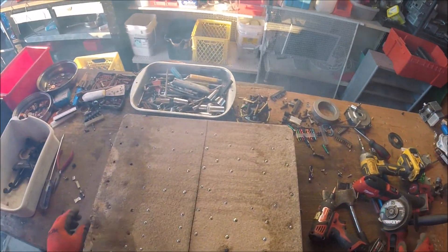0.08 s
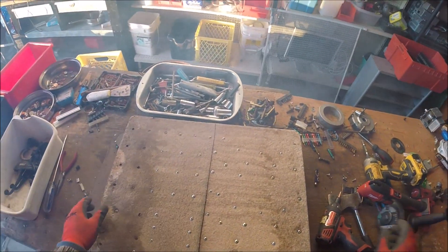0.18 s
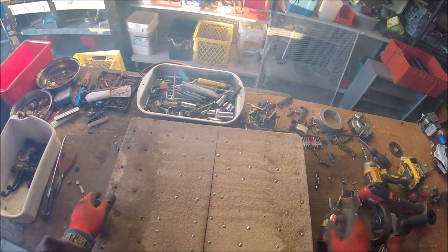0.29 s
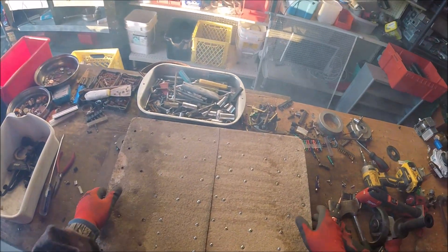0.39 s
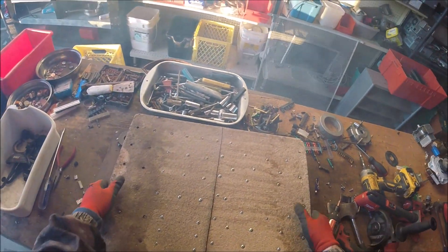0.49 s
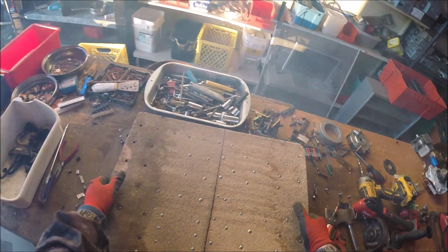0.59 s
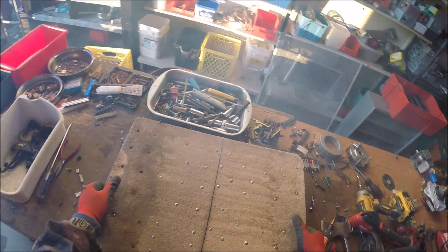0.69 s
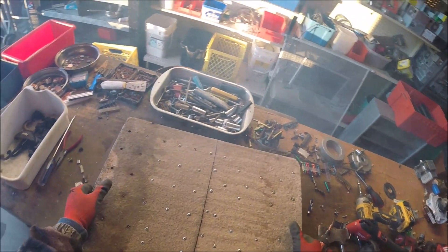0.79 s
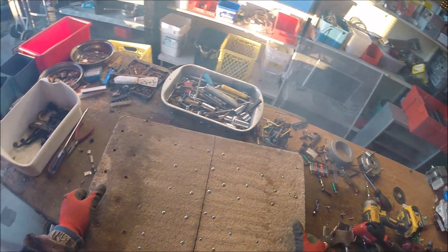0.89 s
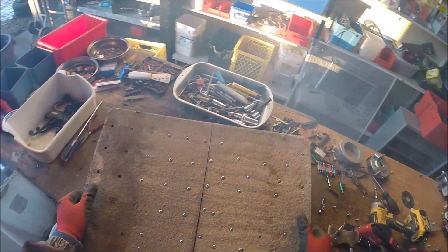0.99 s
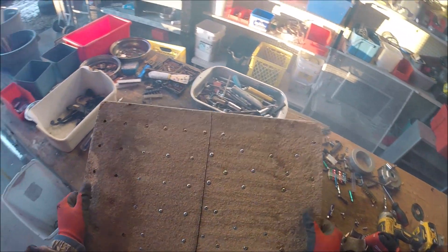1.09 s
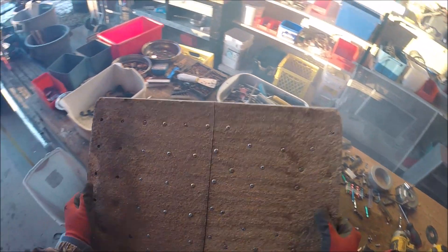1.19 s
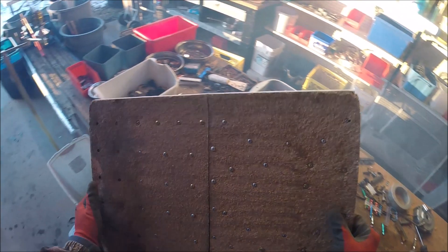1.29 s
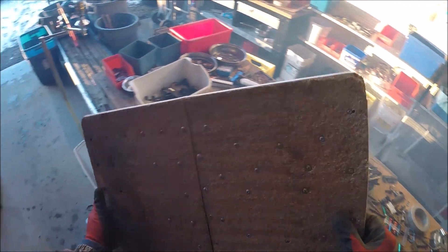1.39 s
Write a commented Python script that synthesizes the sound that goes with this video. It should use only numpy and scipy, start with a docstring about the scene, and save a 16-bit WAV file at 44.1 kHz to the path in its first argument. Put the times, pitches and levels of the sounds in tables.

```python
"""First a low wooden rub and soft thuds: a heavy board is dragged off a cluttered workbench and lifted.
The thuds are swelling sines that set off the bench's damped modes; the edge knocks and grit snaps are
bursts of tiny contacts. The slide is coloured random clicks. Jogged steel tools clank, tinkle and chime
as ringing modes, and one sharp tap sounds as the board comes clear. A small workshop echoes the blows."""
import sys
import numpy as np
from scipy import signal
from scipy.fft import rfft, irfft
from scipy.io import wavfile
from scipy.ndimage import uniform_filter1d, minimum_filter1d

SR = 44100
rng = np.random.default_rng(int(sys.argv[2]) if len(sys.argv) > 2 else 0)


def transcribe(u):
    """Save the signal u as a 16-bit wav file named by the first command-line argument.

    u: samples, shape (n,) or (channels, n), limited to [-1, 1]; the rate is SR.
    q: integer samples, one column per channel.
    """
    v = np.clip(np.atleast_2d(u).T, -1, 1)
    q = np.round(v * 32767).astype(np.int16)
    wavfile.write(sys.argv[1], SR, q)


N = 63945
T = np.arange(N) / SR


def from_db(db):
    """Decibels to gain."""
    return 10 ** (np.asarray(db) / 20)


def rms_one(x):
    """Scale to unit rms."""
    return x / np.sqrt(np.mean(x ** 2) + 1e-20)


def colour(x, points, tilt_db=0):
    """Filter by a spectrum, tilted around 1 kHz in dB per octave."""
    hz = np.maximum(np.arange(N + 1) * SR / (2 * N), 1)
    point_hz, point_db = np.transpose(points)
    # the tilt levels off below 300 Hz and above 8 kHz
    octaves = np.log2(np.clip(hz, 300, 8000) / 1000)
    gain_db = np.interp(np.log(hz), np.log(point_hz), point_db) + tilt_db * octaves
    return irfft(rfft(x, 2 * N) * from_db(gain_db))[:N]


def since(start):
    """Time elapsed after a moment, zero before it."""
    return np.maximum(T - start, 0)


def swelling(start, swell):
    """Envelope that peaks one swell time after its start, then dies away."""
    t = since(start) / swell
    return t * np.exp(1 - t)


def ring(start, modes):
    """Damped modes struck at one moment; each falls 60 dB in its t60."""
    t = since(start)
    return sum(from_db(db - 60 * t / t60) * np.sin(2 * np.pi * hz * t) for hz, db, t60 in modes)


def grains(rate, spread_db):
    """Random clicks of uneven size and either sign, at a mean rate per second."""
    sizes = from_db(spread_db * np.minimum(rng.exponential(1, N), 4))
    struck = rng.random(N) < rate / SR
    return struck * sizes * rng.choice([-1, 1], N)


CONTACT_SPREAD_DB, CONTACT_ATTACK_S = 3.5, 0.00057


def crush(start, decay, spectrum, tilt_db=0):
    """A fast-dying burst of tiny contacts; before its level is set, its energy depends on length alone."""
    t = since(start)
    envelope = (1 - np.exp(-t / CONTACT_ATTACK_S)) * np.exp(-t / decay)
    contacts = colour(grains(SR / 4, CONTACT_SPREAD_DB), spectrum, tilt_db)
    return rms_one(envelope * contacts) * np.sqrt(np.mean(envelope ** 2))


# the board bumps the bench:
# (time [s], level [dB], pitch [Hz], swell [s], level of the bench's ring [dB])
BOARD_THUDS = [(0.1272, -26.5, 359, 0.0044, -59), (0.131, -23, 200, 0.011, -48),
               (0.2374, -9, 206.5, 0.0033, -36), (0.2515, -4.5, 224, 0.0047, -20),
               (.2565, -18, 490, 0.0033, -45), (0.303, -13, 220, 0.0036, -50),
               (.364, -24.5, 162, 0.0062, -49), (.494, -8, 208, 0.0043, -30),
               (.516, -12, 237.5, 0.0037, -55), (.541, -15, 254.7, 0.0074, -64),
               (.633, -11.5, 199, 0.00475, -36.5), (0.672, -18.5, 325, 0.0035, -44),
               (.722, -14.5, 340, 0.0052, -35), (.745, -16, 230, .005, -35),
               (0.834, -24.5, 283, 0.0051, -42), (.908, -25, 400.5, 0.012, -60),
               (1.128, -26.5, 430, .006, -68)]
# modes of bench and board: (frequency [Hz], level [dB], t60 [s])
BENCH_MODES = [(141.3, 0, 0.58), (159.3, 13, 0.11), (248.8, -3.5, 0.38), (294.6, -5, 0.47), (366, -9, 0.1),
               (529, -7.5, 0.26), (579.3, -6.5, 0.3), (653, -8.5, 0.32), (961, -7, 0.18)]


def thuds():
    """Each soft bump swells, dies within a few cycles and rings the bench, a little differently each time."""
    out = np.zeros(N)
    for start, db, hz, swell, ring_db in BOARD_THUDS:
        out += from_db(db) * swelling(start, swell) * np.sin(2 * np.pi * hz * since(start))
        modes = [(mode_hz, mode_db + rng.normal(0, 1), t60) for mode_hz, mode_db, t60 in BENCH_MODES]
        out += from_db(ring_db) * ring(start + swell, modes)
    return out


# gritty knocks of the board's edge: (time [s], level [dB], tilt [dB per octave], decay [s])
EDGE_KNOCKS = [(0.2388, -19, -.7, 0.011), (.252, -13, -2, 0.0087), (0.2586, -12.5, 0.35, 0.0083),
               (0.272, -23.5, .5, 0.034), (0.303, -27, 5, 0.0059), (0.494, -30.5, 2.5, 0.018),
               (0.5014, -15, -.6, 0.0048), (0.635, -26.5, -1.3, 0.013), (0.699, -23.5, 1.5, 0.0072),
               (.708, -25.5, -0.5, 0.0083), (0.7214, -15, 6, 0.0024), (0.7242, -15.5, 6.5, 0.0053),
               (.745, -30, 3, 0.028), (.805, -35.5, 10.5, 0.0086), (0.908, -24.5, 2.5, 0.0055),
               (.947, -29.5, 3.2, 0.0071), (1.064, -27.5, 2.5, 0.011), (1.1215, -30, 7, 0.014),
               (1.1995, -30.5, 4.2, 0.006), (1.2388, -28, 4.5, 0.0053), (1.2665, -27.5, 4.5, 0.0052),
               (1.347, -18.5, 3, 0.0037)]
# spectrum of a knock: (frequency [Hz], level [dB])
KNOCK_SPECTRUM = [(130, -7), (400, 11.5), (900, -2), (1600, -7), (2500, -12.5), (3800, -22.5), (5500, -24),
                  (7000, -39), (10300, -48.5), (11700, -69), (15000, -61)]


def knocks():
    """The board's edge knocks in bursts of gritty contacts, each with its own brightness and length."""
    return sum(from_db(db) * crush(start, decay, KNOCK_SPECTRUM, tilt_db)
               for start, db, tilt_db, decay in EDGE_KNOCKS)


# hard grit cracks under the board: (time [s], level [dB], decay [s])
GRIT_SNAPS = [(.238, -41, 0.0018), (.256, -37, .003), (.2595, -29, 0.0028), (.3375, -34, 0.0016)]
# spectrum of a snap: (frequency [Hz], level [dB])
SNAP_SPECTRUM = [(1000, -17), (5000, 6), (10400, -1), (11600, -20), (15000, -30)]


def snaps():
    """Hard grit cracks in bright bursts of a few milliseconds."""
    return sum(from_db(db) * crush(start, decay, SNAP_SPECTRUM) for start, db, decay in GRIT_SNAPS)


TAP_S, TAP_DB, TAP_CONTACT_S, TAP_LOW_CUT_HZ = 1.3462, -20, 0.00037, 187
# modes of the last sharp tap: (frequency [Hz], level [dB], t60 [s])
TAP_MODES = [(195, -7, 0.15), (412, 4, 0.015), (860, 8.5, 0.009), (1275, 4, 0.012), (2030, 6.5, 0.017),
             (2520, 4, 0.01), (3060, 0.5, 0.016), (3930, -1, 0.01)]


def tap():
    """One hard, short contact close to the microphone, its modes smoothed by the push, with little bass."""
    push = T * np.exp(-T / (TAP_CONTACT_S / 2 / np.pi))
    struck = signal.fftconvolve(ring(TAP_S, TAP_MODES), push / push.sum())[:N]
    low_cut = signal.butter(2, TAP_LOW_CUT_HZ, "high", fs=SR, output="sos")
    return from_db(TAP_DB) * signal.sosfilt(low_cut, struck)


SLIPS_PER_S, SLIP_SPREAD_DB = 1500, 2.0
GRAINS_PER_S, GRAIN_SPREAD_DB = 2600, 4.0
# the bench drones less, against the rub, as the weight leaves it
DRONE_DB, DRONE_FADE_DB_PER_S = 0.5, 15
# the drag: (time [s], level of rub and drone [dB], level of the grit [dB])
SLIDE_LEVELS = [(0, -53.5, -55.5), (.08, -42, -56), (0.221, -44, -59.5), (0.278, -31, -37.5),
                (0.358, -30, -41.5), (0.449, -37.5, -49.5), (.55, -26, -46.5), (0.611, -35, -51),
                (.69, -30.5, -44.5), (.77, -27.5, -37), (0.828, -33, -45), (0.928, -27.5, -39.5),
                (1.0, -38, -48.5), (1.08, -33, -50.5), (1.25, -35.5, -42), (1.32, -43.5, -46.5),
                (1.45, -43, -50)]
# spectra of the board's rub, the bench's drone and the grit: (frequency [Hz], level [dB])
RUB_SPECTRUM = [(140, -20), (200, -3.5), (290, -0.5), (440, -2), (540, -15), (900, -16.5), (2000, -34.5),
                (12000, -86)]
DRONE_SPECTRUM = [(100, -34), (145, 9.5), (210, 1), (700, -96)]
GRIT_SPECTRUM = [(200, -18), (600, 3), (1100, 1.5), (2300, -1.5), (3900, -10), (5500, -12), (6800, -25.5),
                 (10200, -30), (11700, -49), (15000, -62)]


def slide():
    """Uneven slips drum on board and bench while grit crunches between them."""
    time, rub_db, grit_db = np.transpose(SLIDE_LEVELS)
    slips = grains(SLIPS_PER_S, SLIP_SPREAD_DB)
    drone_gain = from_db(DRONE_DB - DRONE_FADE_DB_PER_S * T)
    rub = rms_one(colour(slips, RUB_SPECTRUM)) + drone_gain * rms_one(colour(slips, DRONE_SPECTRUM))
    grit = rms_one(colour(grains(GRAINS_PER_S, GRAIN_SPREAD_DB), GRIT_SPECTRUM))
    return from_db(np.interp(T, time, rub_db)) * rms_one(rub) + from_db(np.interp(T, time, grit_db)) * grit


CHATTER_DB, CHATTER_HZ = 4, 140  # depth of the flutter and its upper rate


def chatter():
    """Random flutter in the level of a loose part's ring; rms 1."""
    low_pass = signal.butter(2, CHATTER_HZ, fs=SR, output="sos")
    flutter = signal.sosfilt(low_pass, rng.standard_normal(N))
    return rms_one(from_db(CHATTER_DB * rms_one(flutter)))


# steel tools are jogged: (time [s], level [dB])
TOOL_CLANKS = [(0.2575, -40.5), (.699, -36), (0.7232, -26)]
# modes of the tools: (frequency [Hz], level [dB], t60 [s])
TOOL_MODES = [(1290, -8, 0.07), (2144, -.5, 0.11), (2500, -7, 0.1), (3020, -5, 0.05), (4350, -2.5, 0.026),
              (5400, -30, 0.21)]


def clanks():
    """Jogged tools ring in damped modes, each mode chattering on its own."""
    out = np.zeros(N)
    for mode in TOOL_MODES:
        out += chatter() * sum(from_db(db) * ring(start, [mode]) for start, db in TOOL_CLANKS)
    return out


TINK_TWIN_RATIO, TINK_TWIN_DB = 0.95, -5  # each part rings with a close second mode
# small loose parts tinkle: (time [s], level [dB], pitch [Hz], t60 [s])
PART_TINKS = [(.272, -43, 5110, 0.14), (0.3381, -34, 5000, 0.021), (.518, -37, 4120, 0.0122),
              (.806, -29.5, 5390, 0.037), (1.125, -31, 3560, 0.03), (1.125, -35, 5800, 0.045),
              (1.246, -37, 5760, 0.028), (1.408, -42, 5280, 0.019)]


def tinks():
    """Small loose parts ring steadily in a pair of close, damped modes."""
    return sum(ring(start, [(hz, db, t60), (hz * TINK_TWIN_RATIO, db + TINK_TWIN_DB, t60)])
               for start, db, hz, t60 in PART_TINKS)


CHIME_S, CHIME_SWELL_S = 1.135, 0.018
# modes of a steel socket: (frequency [Hz], level [dB])
CHIME_MODES = [(6406, -47), (7477, -48)]


def chime():
    """A socket rolls against its neighbours: its chattering ring swells and fades."""
    tones = sum(from_db(db) * chatter() * np.sin(2 * np.pi * hz * T) for hz, db in CHIME_MODES)
    return swelling(CHIME_S, CHIME_SWELL_S) * tones


ROOM_T60_S, ROOM_DELAY_S = 0.47, 0.005


def workshop(x):
    """Dense reflections from shelves and clutter, dying evenly."""
    echoes = grains(SR / 10, 2) * (T > ROOM_DELAY_S) * from_db(-60 * T / ROOM_T60_S)
    return signal.fftconvolve(x, echoes / np.sqrt(np.sum(echoes ** 2)))[:N]


AIR_DB = -47
# spectrum of the room's air: (frequency [Hz], level [dB])
AIR_SPECTRUM = [(30, -13), (130, -18), (250, 7), (500, 1), (1000, 1.5), (2000, -13), (3500, -29),
                (5300, -18), (7000, -18.5), (10300, -22.5), (11500, -30), (15000, -35)]


def air():
    """The room's air as steady coloured noise."""
    return from_db(AIR_DB) * rms_one(colour(rng.standard_normal(N), AIR_SPECTRUM))


BRIGHT_ROOM_DB, THUD_ROOM_DB = -10, -12.5  # sends to the room: knocks and steel, thuds and tap


def scene():
    """Blows and their reflections over the slide and the room's air."""
    near = thuds() + tap()
    bright = knocks() + snaps() + clanks() + tinks() + chime()
    room = workshop(from_db(BRIGHT_ROOM_DB) * bright + from_db(THUD_ROOM_DB) * near)
    return (near + bright + room + slide() + air())[None]


PEAK_LIMIT, LIMITER_SAMPLES, CUTOFF_HZ = 0.92, 300, 15800
# the microphone's bass response: (frequency [Hz], level [dB])
MICROPHONE_BASS = [(25, -21.5), (100, -12), (120, -16), (136, 0.5)]


def record(dry):
    """The microphone sheds the deep bass, a quick limiter holds the peaks and the top is cut."""
    x = colour(dry[0], MICROPHONE_BASS)
    gain = minimum_filter1d(PEAK_LIMIT / np.maximum(np.abs(x), PEAK_LIMIT), size=LIMITER_SAMPLES)
    x = x * uniform_filter1d(gain, size=LIMITER_SAMPLES)
    return signal.sosfilt(signal.cheby2(14, 70, CUTOFF_HZ, fs=SR, output="sos"), x)[None]


dry = scene()
out = record(dry)
transcribe(out)
```